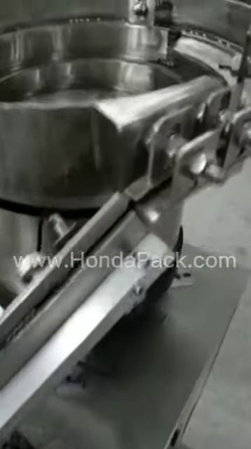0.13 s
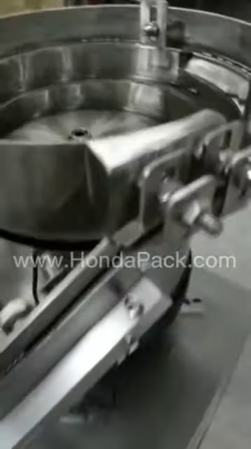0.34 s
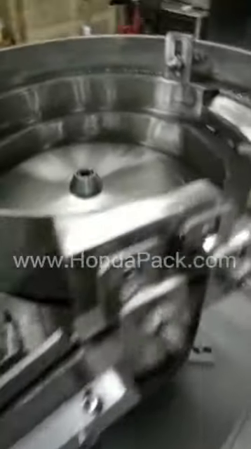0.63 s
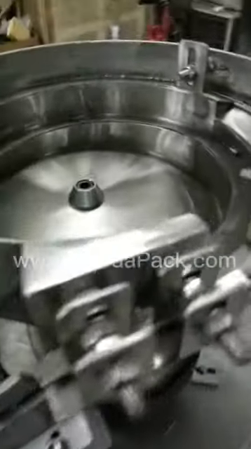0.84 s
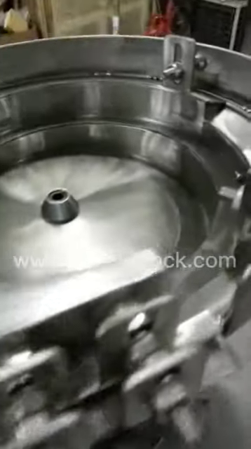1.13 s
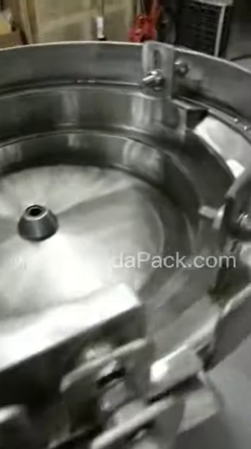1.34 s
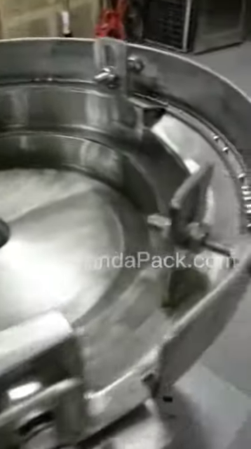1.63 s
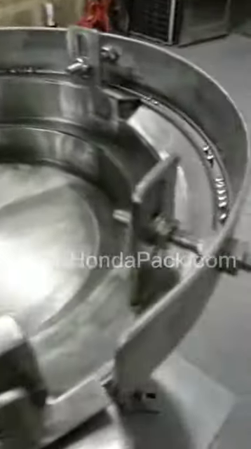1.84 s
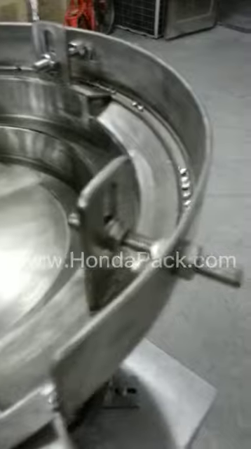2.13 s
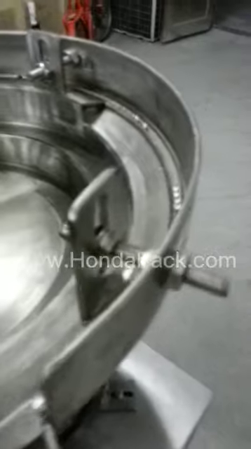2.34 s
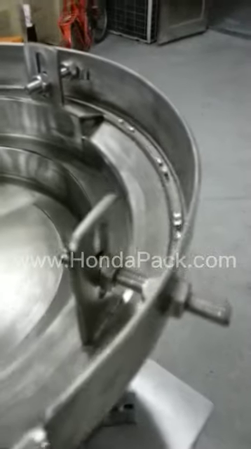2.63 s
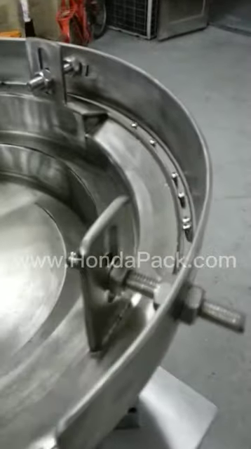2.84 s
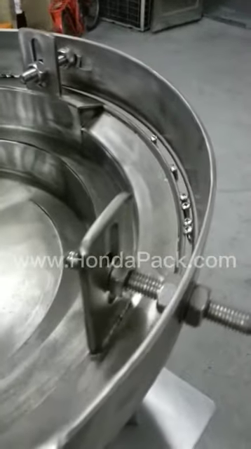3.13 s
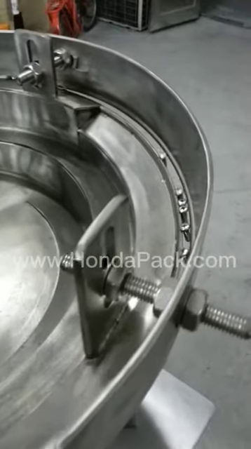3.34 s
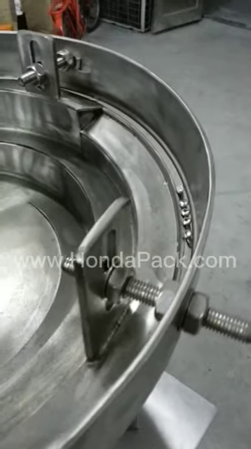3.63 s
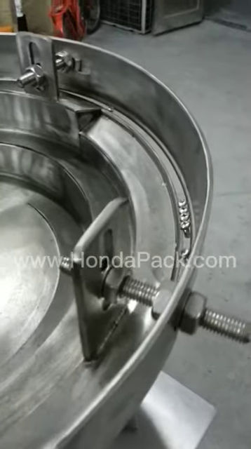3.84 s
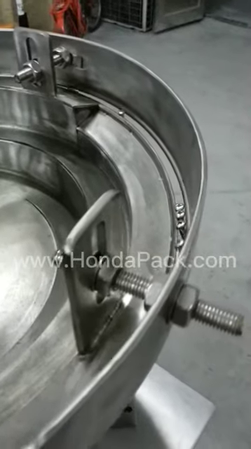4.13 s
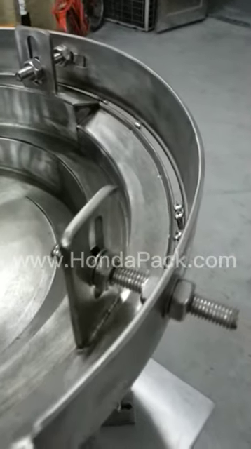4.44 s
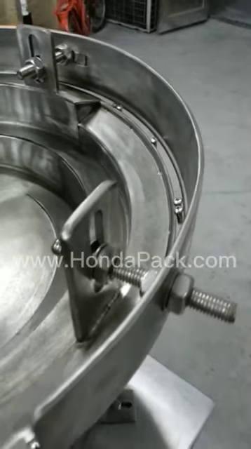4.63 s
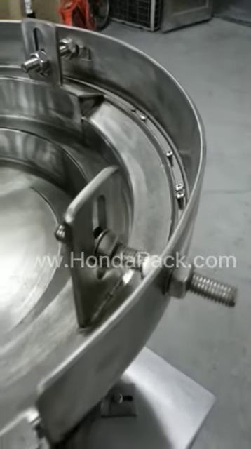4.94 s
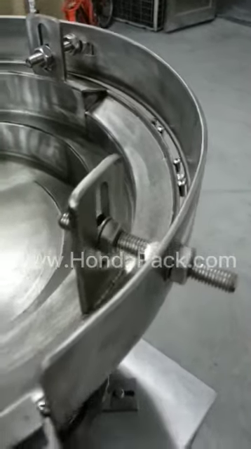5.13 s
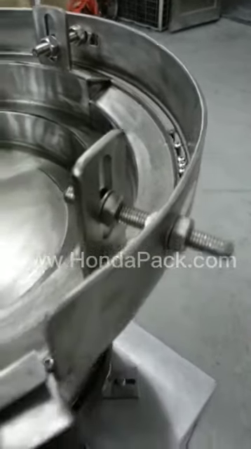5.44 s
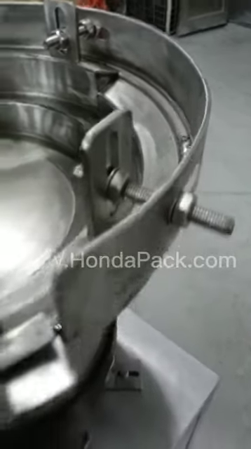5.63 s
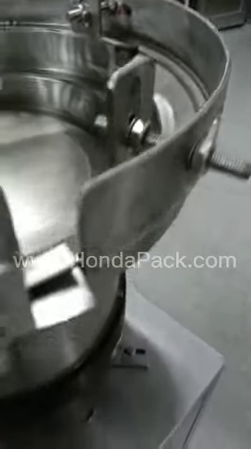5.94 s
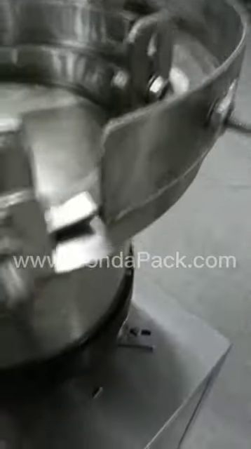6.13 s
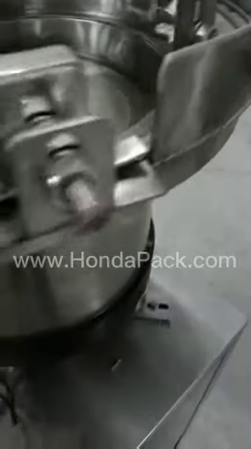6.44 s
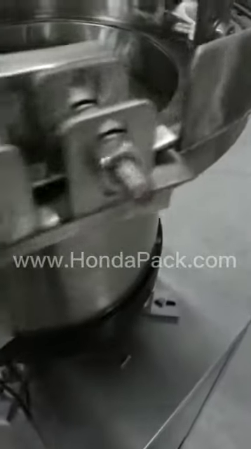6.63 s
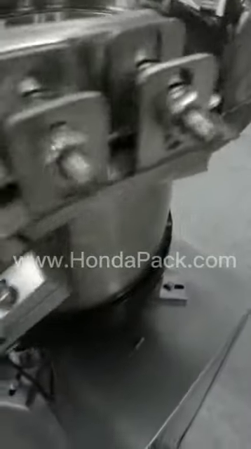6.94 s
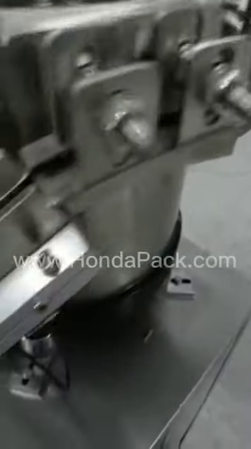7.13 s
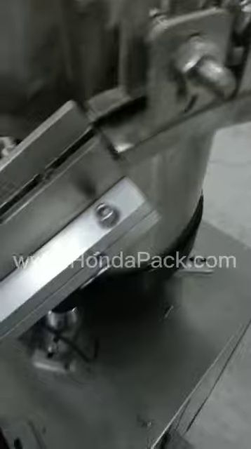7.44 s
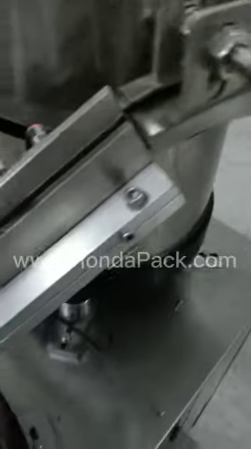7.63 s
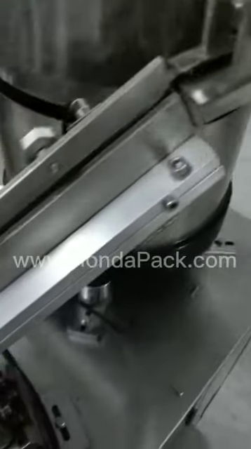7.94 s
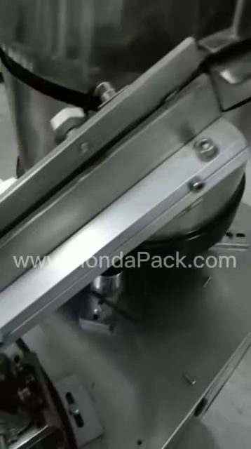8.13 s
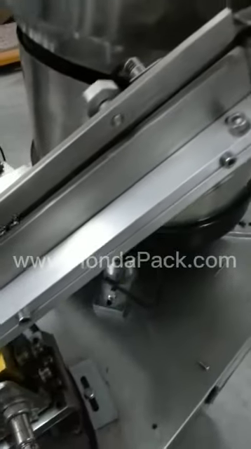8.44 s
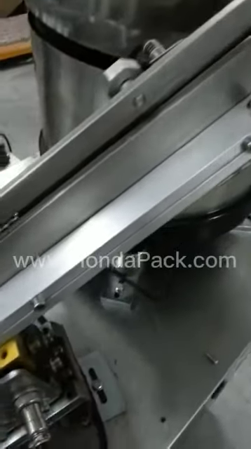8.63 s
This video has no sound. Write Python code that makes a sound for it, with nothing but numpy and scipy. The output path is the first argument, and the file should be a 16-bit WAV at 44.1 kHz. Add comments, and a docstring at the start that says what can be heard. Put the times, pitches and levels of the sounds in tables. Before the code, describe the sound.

A dense, harsh clatter of small metal screws runs throughout, its tiny impacts bunched into a fast electric buzz at about fifty strokes a second. Under it sits a subdued frame drone with flickering low parts. Every three quarters of a second, from about 0.7 s, a batch tumbles down the chute in a short swell of clinks. Sharp single strikes stand out around 0.7, 1.5-2.4 and 5.3 s. Wall ringing and two close high whistles, near 4.5 and 4.7 kHz, waver as the phone moves round the rim, the lower strongest from 2.5 to 5 s and leaning left. Around 6-7 s more knocks arrive and the whistles shift. Beside the chute after 7.3 s, the whistle bursts briefly near 7.5 s, then fades; treble becomes patchy and bright hard ticks cluster near 7.6 and 8.4 s. The sound is close, bass-light and lightly clipped, and the rattle continues to the end at 8.8 s.

```python
"""Small screws hop along the track of a steel vibratory bowl: a dense clatter of tiny impacts, bunched by the
magnet stroke, over ringing steel modes. Some strike hard, and batches tumble down the chute about every
three quarters of a second. Two modes whistle, the frame drones below, and the lowest sound flickers.
A hand-held phone, two microphone ports, moves round the rim and down to beside the chute; it cuts the bass
and the top, partly evens the level and clips the loudest peaks."""
import sys
import numpy as np
from scipy import signal
from scipy.fft import rfft, irfft, next_fast_len
from scipy.io import wavfile
from scipy.ndimage import uniform_filter1d, map_coordinates

SR = 44100
rng = np.random.default_rng(int(sys.argv[2]) if len(sys.argv) > 2 else 0)


def put_to_file(sound):
    """Save the sound as 16-bit audio at rate SR, in the file named by the first command-line argument."""
    columns = np.atleast_2d(sound).T  # one column per channel
    safe = np.clip(columns, -1, 1)
    whole_steps = np.round(safe * 32767)
    wavfile.write(sys.argv[1], SR, whole_steps.astype(np.int16))


N = 387638
TIME = np.arange(N) / SR
STROKE_HZ = 50  # magnet strokes


def undb(db):
    """Turns dB into an amplitude factor."""
    return 10 ** (np.asarray(db) / 20)


def level(x, db):
    """Scales to an rms level in dB."""
    return x * undb(db) / np.sqrt(np.mean(x ** 2))


def curves(table):
    """Columns of a table, after its times, drawn as straight lines through every sample."""
    s, *columns = np.transpose(table)
    return [np.interp(TIME, s, column) for column in columns]


def balance(left_minus_right_db):
    """Gains of the left and right ports, half the difference each."""
    return undb(np.array([left_minus_right_db, -left_minus_right_db]) / 2)


def walk(rate_hz):
    """Random values held 1 / rate and smoothed twice; spread near 1."""
    hold = int(SR / rate_hz)
    steps = np.repeat(rng.standard_normal(N // hold + 1), hold)
    return 1.24 * uniform_filter1d(uniform_filter1d(steps, hold), hold)[:N]


def colour(x, points, modes_db=0., spacing_hz=41.03):
    """Shapes the spectrum through points; a crowd of weak modes adds a fine random ripple."""
    size = next_fast_len(N)
    hz, db = np.transpose(points)
    bins = np.fft.rfftfreq(size, 1 / SR)
    ripple = np.interp(bins, np.arange(2000) * spacing_hz, rng.standard_normal(2000))
    shape_db = np.interp(np.log(bins + 1), np.log(hz + 1), db)
    gain = undb(shape_db + modes_db * ripple)
    return irfft(rfft(x, size) * gain, size)[..., :N]


def ring(x, hz, t60):
    """One mode driven by x, as a complex oscillation that decays 60 dB in t60 seconds."""
    pole = np.exp((2j * np.pi * hz - np.log(1000) / t60) / SR)
    return signal.lfilter([1], [1, -pole], x)


def hops(rate, spread_db, stroke):
    """Impacts of random size and sign, rate a second, more of them around each magnet stroke."""
    chance = rate / SR * (1 + stroke * np.cos(2 * np.pi * STROKE_HZ * TIME))
    hit = rng.random(N) < chance
    size_db = spread_db * np.minimum(rng.exponential(size=N), 4)
    return hit * rng.standard_normal(N) * undb(size_db)


def smear(x, tail_s):
    """Every impact leaves a short noisy tail from the many weak modes of the steel."""
    energy = signal.lfilter([1], [1, -np.exp(-2 / (tail_s * SR))], x ** 2)
    return np.sqrt(energy) * rng.standard_normal(N)


# The phone turning in the hand: t/s, delay of left behind right/samples, left minus right/dB
PHONE_TURN = [(0, -4, 2.5), (.7, -6.5, 1), (1.7, 5, 2), (3.3, 5.5, 1.3), (4.7, -13, 1), (6, -6, 1.5),
              (7.2, -10, 2), (8.79, -4, 1.5)]


def ports(near, far, share):
    """Both ports hear the near sound, one a little later; each hears its own scattered sound."""
    lag = curves(PHONE_TURN)[0]
    left = map_coordinates(near, [np.arange(N) - lag], order=3, mode="nearest")
    direct = np.sqrt(share) * level(np.array([left, near]), 0)
    return direct + np.sqrt(1 - share) * level(far, 0)


def impacts(points, rate, spread_db, stroke, tail_s, share):
    """A broad band of impacts at 0 dB; the scattered part rings on longer."""
    near = smear(hops(rate, spread_db, stroke), tail_s)
    far = np.array([smear(hops(rate, spread_db, stroke), 7.3 * tail_s) for _ in range(2)])
    return level(colour(ports(near, far, share), points, modes_db=1.4), 0)


def steel(modes, waver_db, turning, even_s=0.39, lead=0.):
    """Hops keep every mode ringing; the phase between the ports turns slowly about lead (radians)."""
    out, stream = 0, hops(400., 2.95, 0.33)
    for hz, t60, db in modes:
        z = ring(np.roll(stream, rng.integers(N)), hz, t60)
        # the stream of screws is even, so over even_s the ring keeps its strength
        z = z / np.sqrt(uniform_filter1d(np.abs(z) ** 2, int(even_s * SR)))
        z = z * undb(waver_db * walk(2.976))
        turn = np.exp(.5j * (lead + turning * np.tanh(2 * walk(2))))
        out = out + level(np.array([(z * turn).imag, (z / turn).imag]), db)
    return out


# Hum below the bowl: f/Hz, relative level/dB per Hz
HUM_SPECTRUM = [(120, -74), (200, -26.5), (274, -11), (405, -8), (576, -4.5), (775, -1.5), (988, -8),
                (1300, -8), (1690, -28), (2860, -120)]
# Ringing parts of the frame: f/Hz, t60/s, relative level/dB
FRAME_MODES = [(564, .5, -8), (582, .6, -7), (642, .3, -10), (700, .3, -12), (783, .5, -7.5),
               (1057, .3, -10.5)]
# How strongly the frame reaches the phone: t/s, level/dB
DRONE_AT_PHONE = [(0, -24), (1, -26.5), (2.5, -25), (3.6, -27.5), (5, -26), (5.9, -25), (8, -25.5),
                  (8.79, -23.5)]


def frame_drone():
    """Coloured noise hums steadily while hops keep the low frame modes ringing."""
    noise = rng.standard_normal((3, N))
    hum = colour(ports(noise[0], noise[1:], 0.53), HUM_SPECTRUM, modes_db=3.0, spacing_hz=12.)
    frame = steel(FRAME_MODES, waver_db=1.5, turning=1.0, even_s=0.77) * undb(-1.5)
    return (level(hum, 0) + frame) * undb(curves(DRONE_AT_PHONE)[0])


# Ringing parts of the bowl wall: f/Hz, t60/s, relative level/dB
WALL_MODES = [(1695, .35, -4), (2439, .4, -1), (2619, .25, -3), (2751, .5, -1.5), (8200, .12, -4)]
# How strongly the wall rings at the phone: t/s, level/dB
WALL_AT_PHONE = [(0, -46), (.9, -28), (1.5, -30.5), (3.3, -28.5), (4.3, -25), (5.4, -27.5), (5.9, -34),
                 (6.6, -32.5), (7.6, -34), (8.79, -44)]


def wall_rings():
    """Hops keep the modes of the wall ringing, mostly lower than those of the track."""
    rings = steel(WALL_MODES, waver_db=1.0, turning=0.77, lead=-1.27)
    return rings * undb(curves(WALL_AT_PHONE)[0])


# Ringing parts of the track: f/Hz, t60/s, relative level/dB
TRACK_MODES = [(3546, .25, -5), (4995, .2, -6), (5165, .25, -5), (6457, .2, -3), (6682, .25, -1),
               (6788, .3, -5), (6968, .25, -3), (7380, .2, -4), (9540, .15, -4), (11490, .15, -7)]
# How strongly the track rings at the phone: t/s, level/dB
TRACK_AT_PHONE = [(0, -26.5), (.55, -27), (1.1, -30.5), (2.2, -36.5), (4.3, -32.5), (5.5, -32),
                  (6.6, -32.5), (7.6, -31.5), (8.4, -37), (8.79, -41)]


def track_rings():
    """Hops keep the modes of the track ringing."""
    return steel(TRACK_MODES, waver_db=2.5, turning=2.02) * undb(curves(TRACK_AT_PHONE)[0])


# Single steel modes that sing out as the phone passes: start t/s, length/s, f/Hz, level/dB
PASSING_RINGS = [(0, 0.38, 6682, -26), (0.498, .15, 6400, -27), (0.819, 0.2, 2740, -23.5),
                 (1.099, 0.37, 3550, -27.5), (1.198, 0.21, 6968, -25), (3.699, .7, 2750, -26.5),
                 (4.576, 0.25, 2440, -27), (6.332, 0.13, 2751, -27), (6.557, 0.144, 3748, -25),
                 (7.049, 1.93, 603.5, -30.5), (7.497, 0.059, 3740, -20), (8.166, .075, 3700, -21)]


def brief_rings(edge_s=0.032, t60=.45, phase_spread=0.38):
    """Noise drives one mode at a time, which swells, holds and fades; phase_spread in radians."""
    out = np.zeros((2, N))
    for s, length, hz, db in PASSING_RINGS:
        part = slice(int(s * SR), int((s + length) * SR))
        t = TIME[part] - s
        z = ring(rng.standard_normal(SR // 4 + len(t)), hz, t60)[SR // 4:]  # already ringing at the start
        z = z / np.sqrt(uniform_filter1d(np.abs(z) ** 2, int(.08 * SR)))
        hold = np.clip(np.minimum(t, length - t) / edge_s, 0, 1)
        left = z * np.exp(1j * phase_spread * rng.standard_normal())
        out[:, part] += hold * level(np.array([left.imag, z.imag]), db)
    return out


def whistle(modes, heard):
    """A part rings in bursts; where the phone is sets its phase and balance at the ports."""
    db, lead, left_minus_right_db = curves(heard)
    bursts = level(undb(1.56 * walk(24)), 0)
    tone = steel(modes, waver_db=-1.1, turning=0.33, even_s=0.15, lead=lead)
    return tone * bursts * undb(db) * balance(left_minus_right_db)


# Ringing part of the rim: f/Hz, t60/s, relative level/dB
RIM_MODES = [(4489, .6, 0)]
# The phone moving through the rim's sound: t/s, level/dB, left lead/rad, left minus right/dB
RIM_AT_PHONE = [(0, -27, 0, -8), (.5, -29, 1, -3), (.85, -23.5, 1, -1), (1.15, -36, -3.5, 2),
                (1.9, -32, 1, 4), (2.3, -32, 0, 4), (2.5, -24, 2, -1), (3.0, -23, 3, 14),
                (3.4, -22.5, 5.5, 10.5), (3.7, -19.5, 4.5, 10), (4.0, -18.5, 3.5, 9.5), (4.8, -18, 1.5, 5),
                (5.3, -27.5, 1.3, 3), (5.5, -21.5, 4, 13), (5.9, -30, -0.5, 5), (6.2, -38, 3, -2),
                (6.65, -30, -7.5, 6), (7.0, -17.5, -6, 0), (7.12, -27.5, -7, 3), (7.53, -13, -8.5, 7),
                (7.62, -31, -7.5, 4), (7.85, -20.5, -7.5, 8), (8.25, -43, -5, 5), (8.79, -42, -7, 3)]


def rim_whistle():
    """One mode of the rim whistles loudly, kept going by the hops."""
    return whistle(RIM_MODES, RIM_AT_PHONE)


# Ringing part of the bracket: f/Hz, t60/s, relative level/dB
BRACKET_MODES = [(4725, .6, 0)]
# The phone moving through the bracket's sound: t/s, level/dB, left lead/rad, left minus right/dB
BRACKET_AT_PHONE = [(0, -24, -3.5, -1), (.5, -31, 1.5, 2), (.62, -32, 1, 6), (.84, -20, 0.5, 5),
                    (1.1, -38, 5.5, 2), (1.8, -27, 5, 3), (2.3, -36, 7, -6), (2.6, -24, 4, -1),
                    (4.9, -23, 3.5, 1), (5.7, -24.5, 1.2, 1), (6.33, -22.5, -0.1, -14), (6.45, -35, 1, -8),
                    (6.8, -22, 2.5, -7), (7.1, -25, -1.5, 7), (7.4, -50, -4, 0), (8.79, -43, -2, -2)]


def bracket_whistle():
    """One mode of the bracket whistles a little above the rim, kept going by the hops."""
    return whistle(BRACKET_MODES, BRACKET_AT_PHONE)


# Treble of the impacts: f/Hz, relative level/dB per Hz
RATTLE_SPECTRUM = [(3530, -33), (6000, -5), (6700, -3), (11100, -1.5), (13000, -6), (14400, -2.5)]
# Ringing of the screws themselves: f/Hz, t60/s, level/dB against the impacts
SCREW_MODES = [(12189, .2, -19), (13617, .15, -17)]
# Treble at the phone, fairly steady at the rim, patchy later: t/s, level/dB
RATTLE_AT_PHONE = [(0, -19), (1.3, -19), (4, -18), (6.4, -20.5), (6.9, -18), (7.1, -21.5), (7.3, -17.5),
                   (7.45, -27), (7.6, -16.5), (7.85, -22), (8.03, -19.5), (8.2, -30), (8.4, -18),
                   (8.6, -25), (8.79, -25.5)]


def treble_rattle(jostle):
    """Very short impacts, strongly bunched by the stroke, fill the treble as the screws ring."""
    band = impacts(RATTLE_SPECTRUM, rate=3000., spread_db=2.9, stroke=0.36, tail_s=0.0012, share=0.063)
    rattle = band * undb(1.1 * jostle) + steel(SCREW_MODES, waver_db=4.5, turning=2.8)
    return rattle * undb(curves(RATTLE_AT_PHONE)[0] + 1.1 * walk(6))


# Batches tumbling down the chute: middle t/s, level/dB, centre f/Hz
CHUTE_BATCHES = [(.68, -11.5, 4570), (1.48, -18, 4500), (2.197, -10, 4800), (3.01, -9, 4400),
                 (3.78, -7.5, 4400), (4.548, -9, 4500), (5.318, -10.5, 4500), (6.073, -11.5, 4600),
                 (6.864, -8, 4600), (7.6, -9, 5460), (8.38, -9, 4800)]
BATCH_S = 0.17  # from the middle of a batch to either end


def batches(rate=600., spread_db=1.5, tail_s=.005):
    """A handful of screws knocks down the chute: a swell of overlapping broad clinks."""
    knocks = hops(rate, spread_db, 0.)
    knocking = level(np.array([smear(knocks, tail_s) for _ in range(2)]), 0)
    out = np.zeros((2, N))
    for s, db, hz in CHUTE_BATCHES:
        part = slice(int((s - BATCH_S) * SR), int((s + BATCH_S) * SR))
        swell = np.exp(-((TIME[part] - s) / (.5 * BATCH_S)) ** 2)
        band = signal.butter(2, [0.59 * hz, 1.45 * hz], "band", fs=SR, output="sos")
        out[:, part] += signal.sosfilt(band, knocking[:, part] * swell) * undb(db) / 1.13
    return out


def clinks(count=4000, low_hz=1792.0, high_hz=9465.0, t60=0.08, db=-28.5, spread_db=3.5, pan_db=2.0):
    """Lone small screws click against steel, each with its own short ring."""
    out, t = np.zeros((2, N + SR // 16)), np.arange(SR // 16) / SR
    sides = np.array([[1], [-1]])
    for when, pitch, size, life, side, phase in rng.random((count, 6)):
        hz = low_hz * (high_hz / low_hz) ** pitch
        fade = 1000 ** (-t / (t60 * (0.42 + life))) * np.minimum(t / .0005, 1)
        tone = np.sin(2 * np.pi * (hz * t + np.array([[0], [phase]]))) * fade
        stroke = int(when * N / SR * STROKE_HZ)
        i = int((stroke + phase * side) * SR / STROKE_HZ) % N  # most land early in a stroke
        size_db = db + spread_db * min(-np.log(size), 3)
        out[:, i:i + len(t)] += tone * undb(size_db + pan_db * (side - .5) * sides)
    return out[:, :N]


# Single screws that strike hard: t/s, level/dB, f/Hz, left minus right/dB
HARD_STRIKES = [(0.6579, -8, 4730, -1), (0.7096, -4.5, 4970, 1), (0.718, -7, 3300, 1),
                (0.7363, -9, 2200, 4), (1.213, -11, 7040, 1.0), (1.489, -4, 3530, -1),
                (1.504, -12, 4000, 0), (1.6207, -2, 5860, 2.5), (1.8992, -8.5, 4600, 10),
                (1.9595, -9, 3440, 6), (2.17, -10, 4240, 0), (2.258, -7, 3540, 7), (2.3894, -9, 3880, 1.5),
                (2.727, -10, 2620, 8), (5.277, -9, 4500, 0), (5.335, -6, 3900, 0), (5.357, -11, 5200, 0),
                (6.037, -12, 5630, -7), (6.064, -10, 5260, -4), (6.103, -8.5, 3000, 5),
                (6.12, -10, 2300, 0), (6.1724, -11.5, 4800, -3), (6.8746, -3, 3330, -2),
                (6.891, -9, 2500, 0), (7.547, -6, 4490, 0.5), (7.5725, -7, 5460, -2),
                (7.608, -10, 3650, -2), (7.6335, -4, 5150, 5), (7.648, -4, 6390, 2), (8.075, -9.5, 4200, 1),
                (8.115, -7, 1700, -2), (8.3215, -12, 6270, -0.5), (8.3332, -6, 5500, -2),
                (8.378, -9, 5450, 0.0), (8.391, -10, 5770, 0), (8.414, -5, 3890, -1), (8.431, -8, 2300, 0)]
AT_CHUTE_S, TICK_DB = 7.3, -5.5  # from here, beside the chute, each strike has a bright tick


def strikes(t60=0.047, tail_s=0.0052, bounce_s=0.0045, bounce_db=-5.0, rise_s=0.0013):
    """A loud screw rings a cluster of modes, longer the higher it sounds, cracks and bounces twice."""
    out, t = np.zeros((2, N + SR // 2)), np.arange(SR // 4) / SR
    for s, db, hz, left_minus_right_db in HARD_STRIKES:
        spread = rng.standard_normal(6)
        phase = 2 * np.pi * rng.random(6) + 0.84 * rng.standard_normal((2, 6))
        cluster_hz = hz * (1 + .08 * (spread - spread.mean()))
        tone = np.sin(2 * np.pi * np.outer(t, cluster_hz) + phase[:, None]).sum(axis=2) / 3.2
        band = signal.butter(2, [.6 * hz, min(1.5 * hz, 14000)], "band", fs=SR, output="sos")
        spray = rng.standard_normal(len(t)) + .7 * rng.standard_normal((2, len(t)))
        crack = signal.sosfilt(band, spray)
        if s > AT_CHUTE_S:
            crack = crack + undb(TICK_DB) * np.diff(rng.standard_normal(len(t) + 1)) / 2
        fade = 1000 ** (-t / (t60 * hz / 4500))  # t60 holds at 4500 Hz
        hit = (tone * fade + crack * np.exp(-t / tail_s)) * np.minimum(t / rise_s, 1)
        sides = balance(np.array([left_minus_right_db]))
        delays = np.cumsum([0, *(bounce_s * (.5 + rng.random(2)))])
        for bounce, late in enumerate(delays):
            i = int((s + late) * SR)
            out[:, i:i + len(t)] += hit * undb(db + bounce * bounce_db) * sides
    return out[:, :N]


# Broad clatter of the load: f/Hz, relative level/dB per Hz
CLATTER_SPECTRUM = [(530, -43), (900, -1), (1710, 0), (2070, -1), (2700, 0.5), (3040, -2), (4370, 2.5),
                    (7000, -10), (9100, -12.5), (15400, -120)]


def clatter(jostle):
    """Thousands of tiny impacts a second merge into a broad clatter, mostly scattered by the steel."""
    band = impacts(CLATTER_SPECTRUM, rate=2800., spread_db=3.0, stroke=0.13, tail_s=0.0022, share=0.062)
    return band * undb(-17. + 0.95 * jostle)


def flicker(x, edge_hz=380., dip_db=16.):
    """The lowest part of the sound dips for brief moments, by up to 1.5 times dip_db."""
    low = signal.sosfiltfilt(signal.butter(6, edge_hz, fs=SR, output="sos"), x)
    return x - low * (1 - undb(-dip_db * np.clip(walk(16), 0, 1.5)))


def scene():
    """All layers at the two ports, from the frame up to the screws."""
    jostle = walk(12)  # the whole load of screws rattles harder or softer together
    drone = frame_drone()
    rings = wall_rings() + track_rings() + brief_rings()
    whistles = rim_whistle() + bracket_whistle()
    rattle = treble_rattle(jostle)
    turned = (rings + batches() + clinks() + clatter(jostle)) * balance(curves(PHONE_TURN)[1])
    return flicker(drone + whistles + rattle + turned + strikes())


BOTTOM_HZ, TOP_HZ = 239, 14450  # range the phone passes
GAIN_TARGET_DB, GAIN_RATIO, GAIN_S = -13, 1.9, 0.088  # gain control; smoothing time in s


def record(dry):
    """The phone cuts the bass steeply, evens the level, clips the loudest peaks and cuts the top."""
    thin = signal.sosfilt(signal.butter(8, BOTTOM_HZ, "high", fs=SR, output="sos"), dry)
    noise = rng.standard_normal(N) + rng.standard_normal((2, N))  # partly shared by the ports
    rumble = signal.sosfilt(signal.butter(2, BOTTOM_HZ, fs=SR, output="sos"), noise)
    thin = thin + level(rumble * undb(5. * walk(8)), -77.5)  # a faint, uneven rumble stays below the cut
    keep = np.exp(-1 / (GAIN_S * SR))
    both = np.mean(thin ** 2, axis=0)
    power = signal.lfilter([1 - keep], [1, -keep], both, zi=[undb(2 * GAIN_TARGET_DB)])[0]
    even = thin * (undb(GAIN_TARGET_DB) / np.sqrt(power)) ** (1 - 1 / GAIN_RATIO)
    top = signal.ellip(12, .2, 80, TOP_HZ, fs=SR, output="sos")
    return signal.sosfilt(top, np.clip(even, -.94, .94))


dry = scene()
out = record(dry)
put_to_file(out)
```